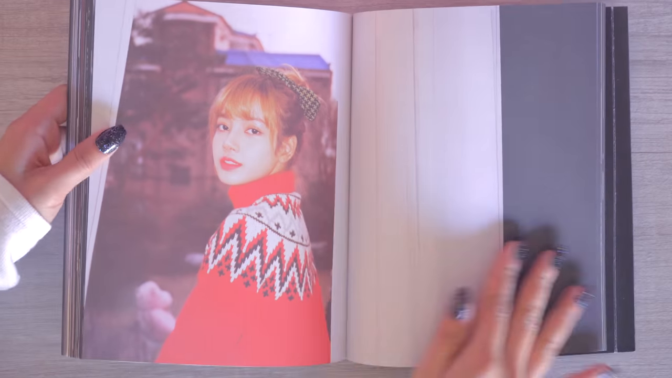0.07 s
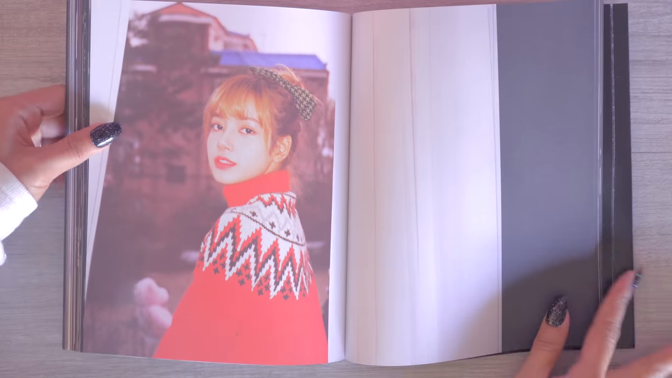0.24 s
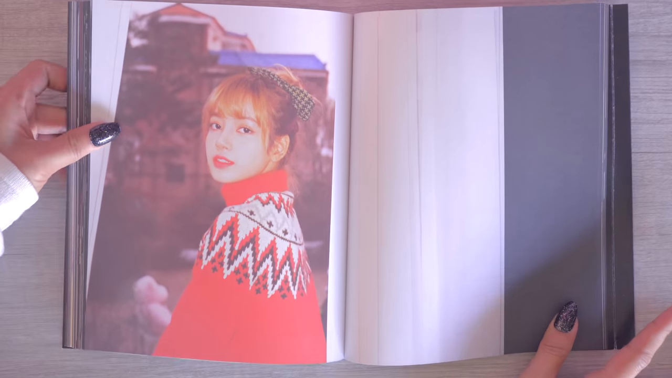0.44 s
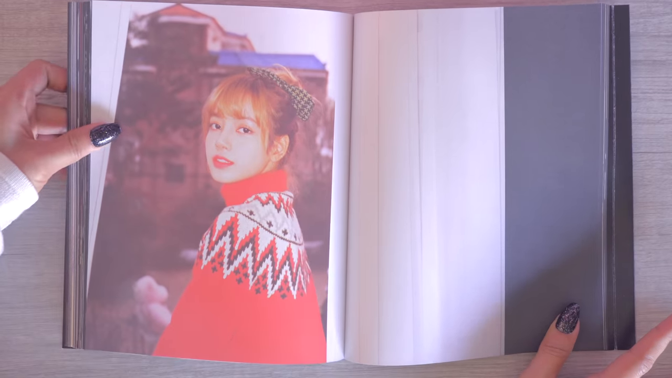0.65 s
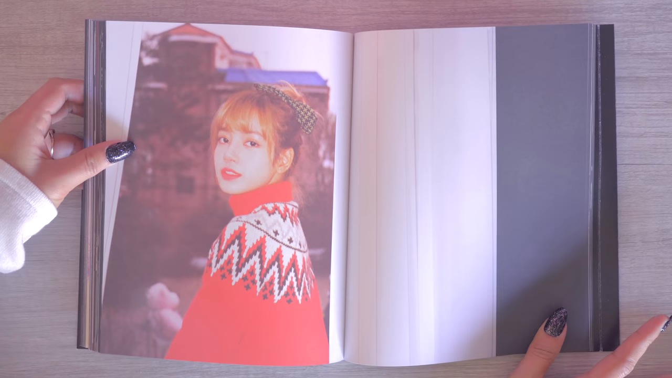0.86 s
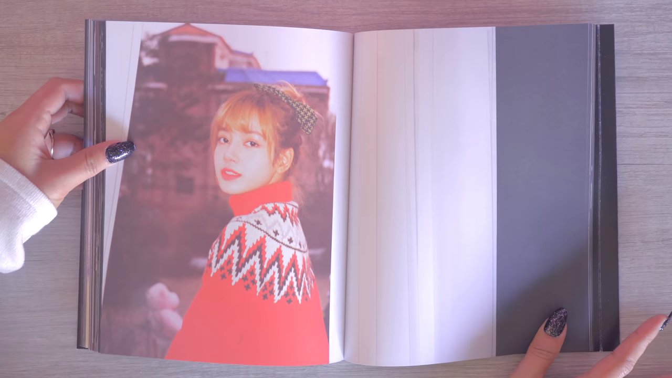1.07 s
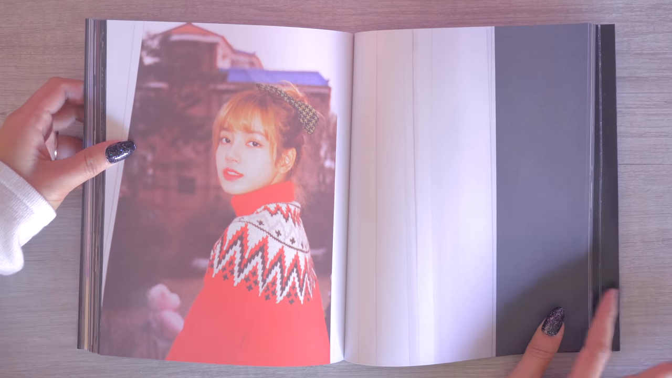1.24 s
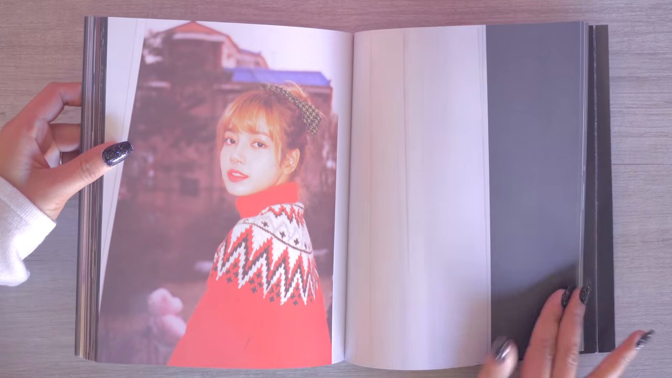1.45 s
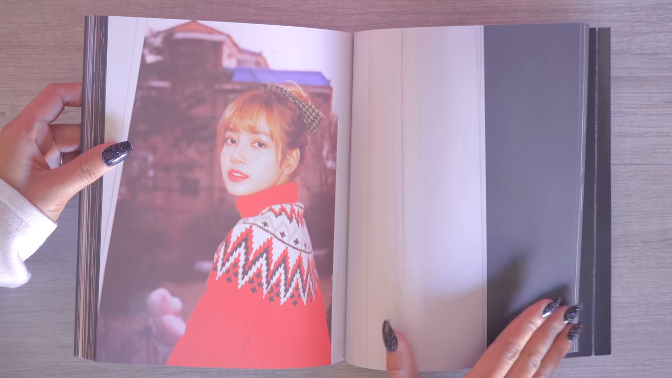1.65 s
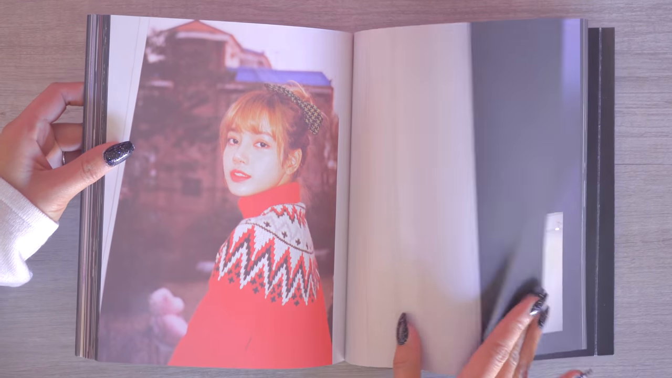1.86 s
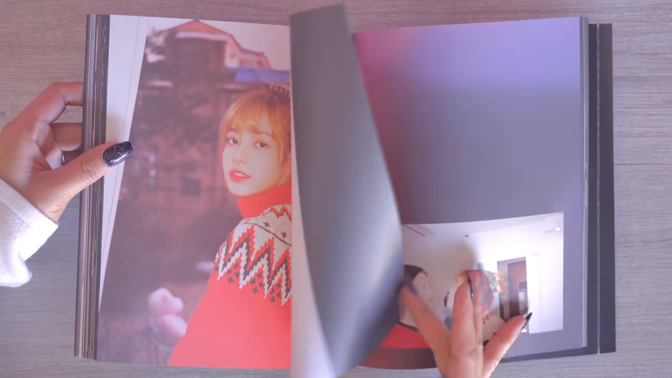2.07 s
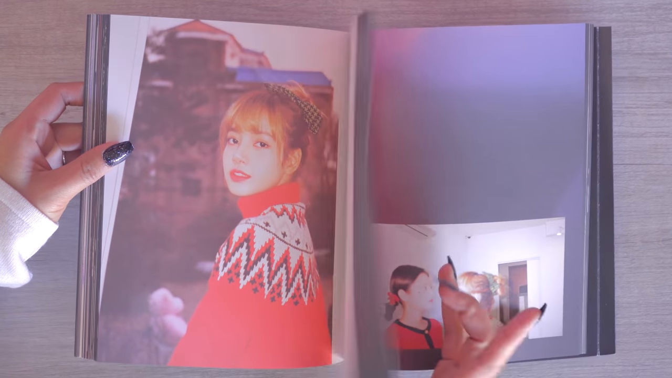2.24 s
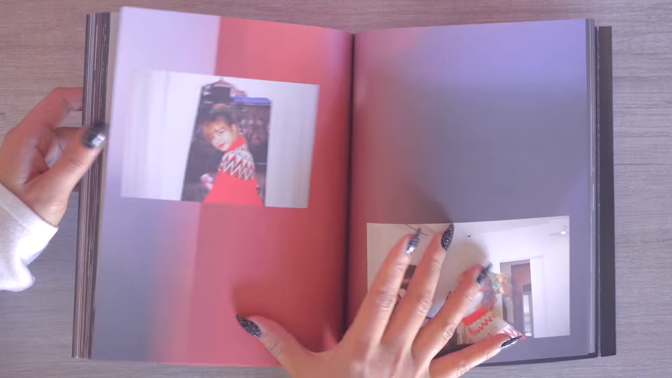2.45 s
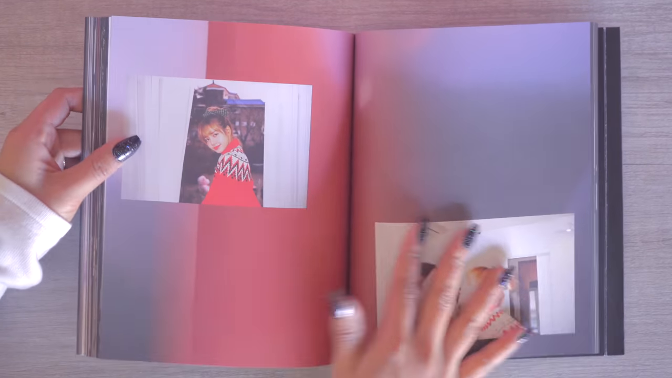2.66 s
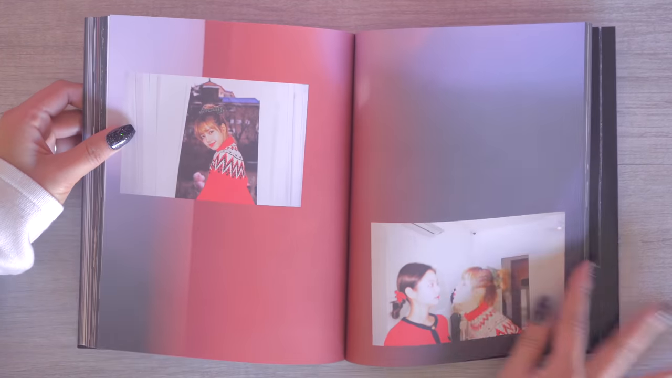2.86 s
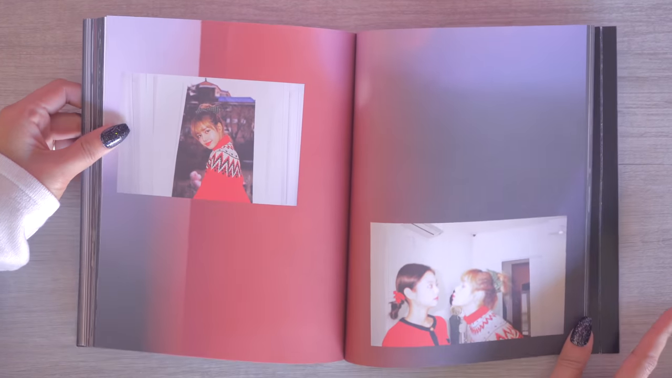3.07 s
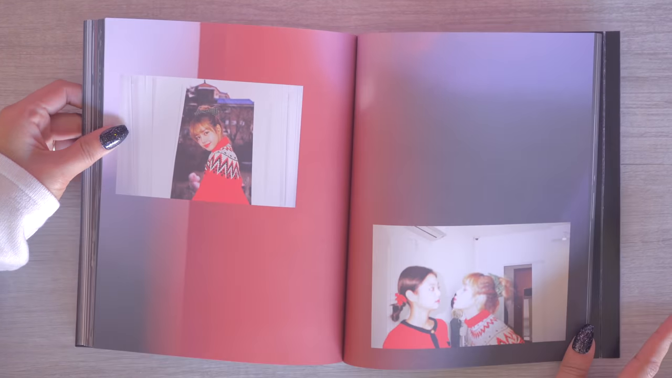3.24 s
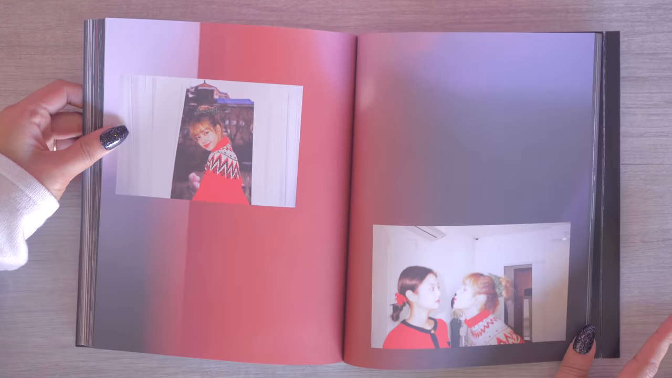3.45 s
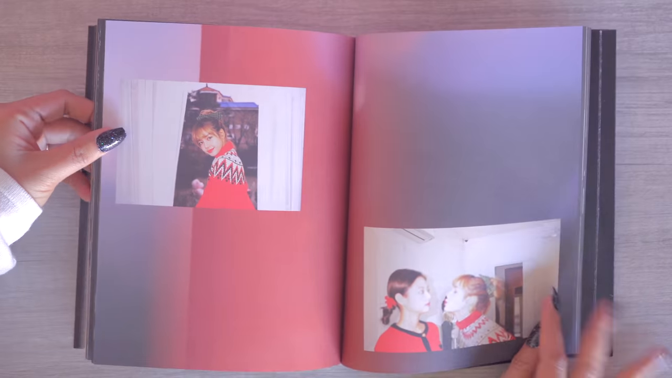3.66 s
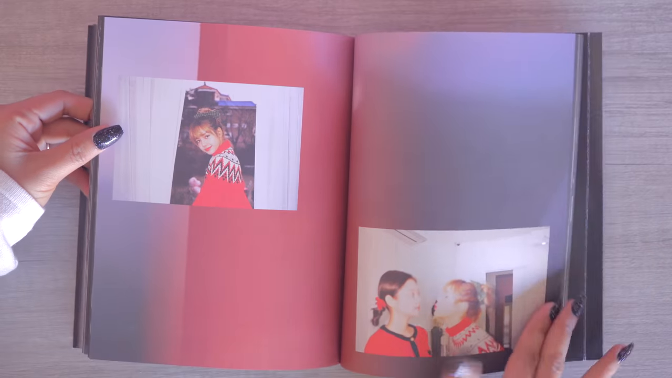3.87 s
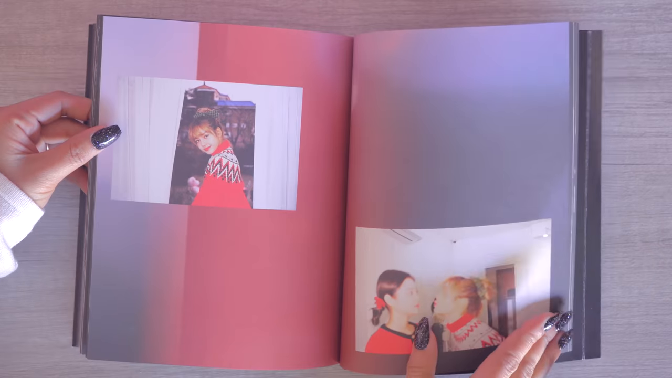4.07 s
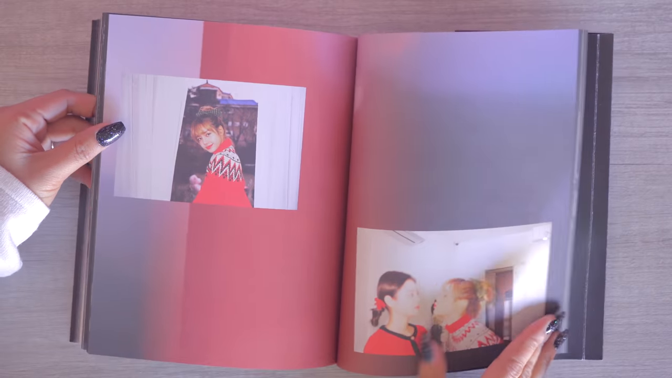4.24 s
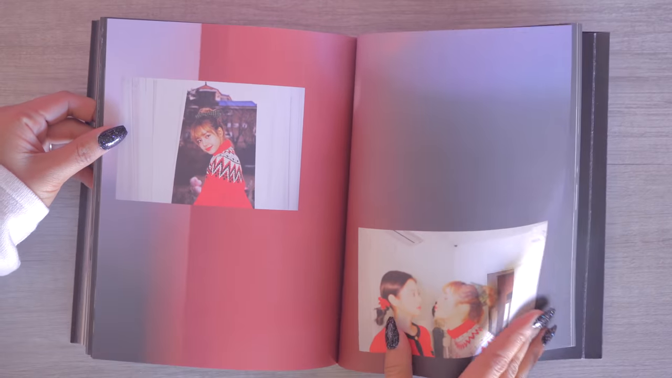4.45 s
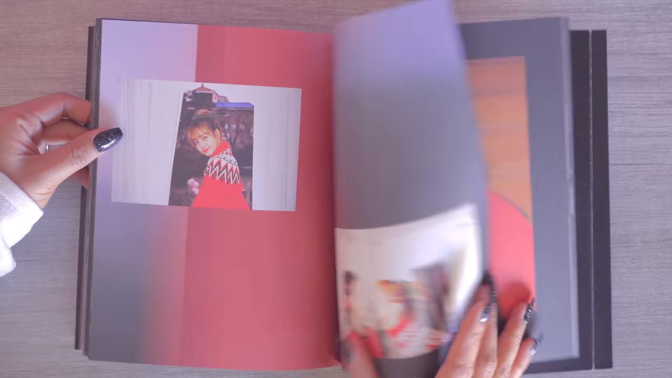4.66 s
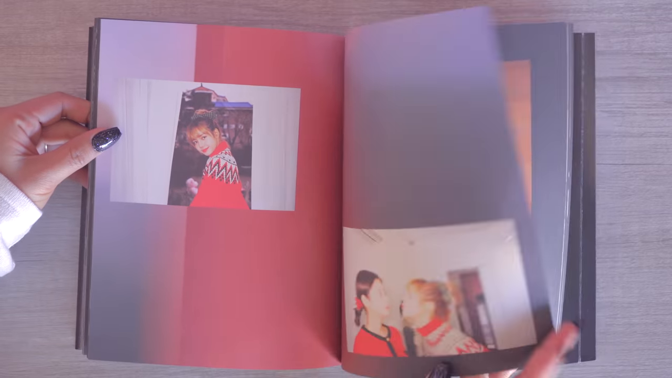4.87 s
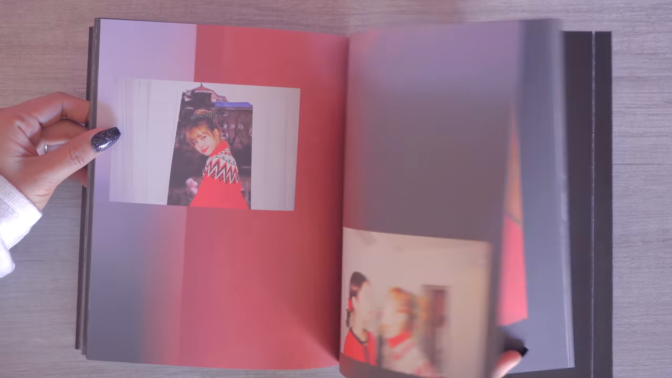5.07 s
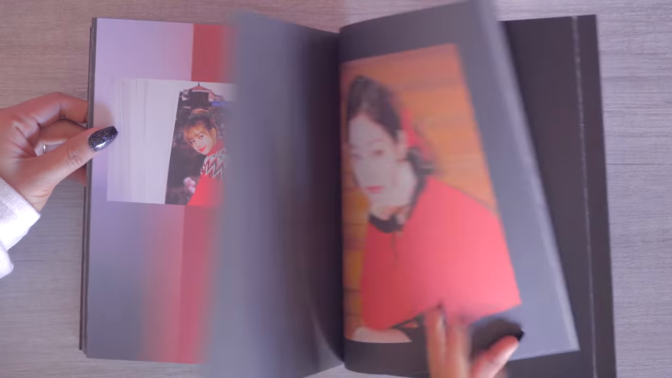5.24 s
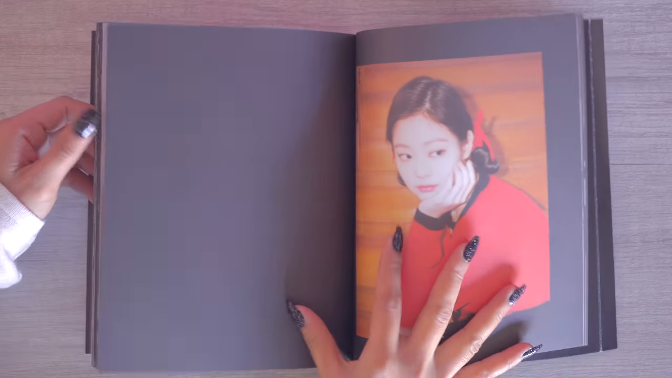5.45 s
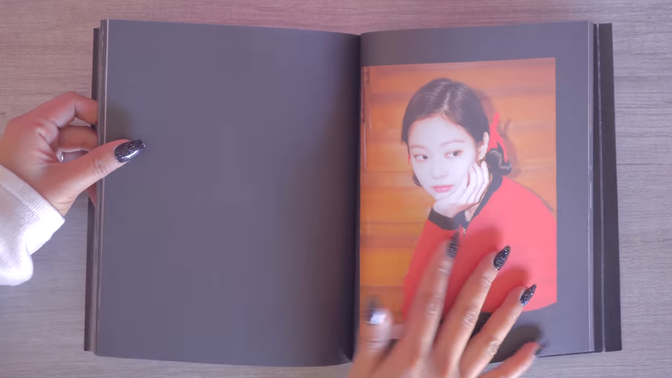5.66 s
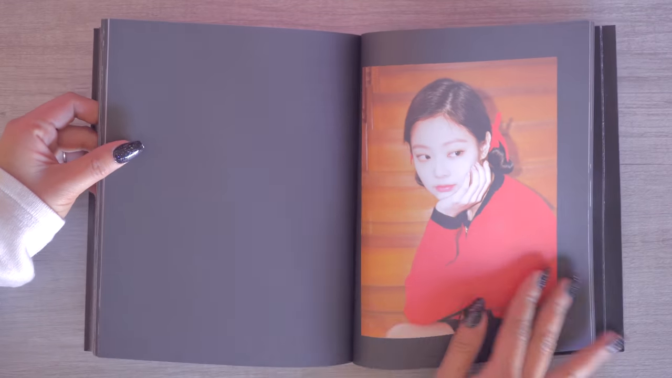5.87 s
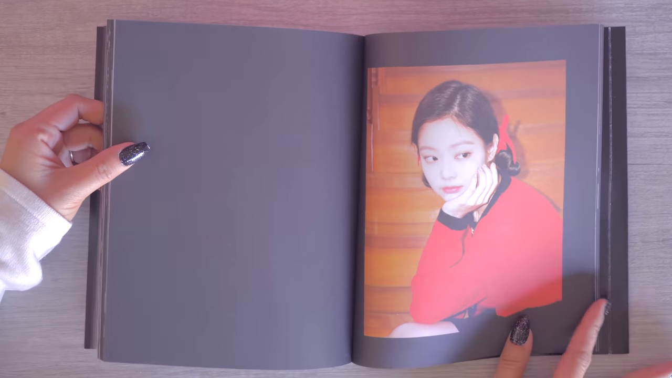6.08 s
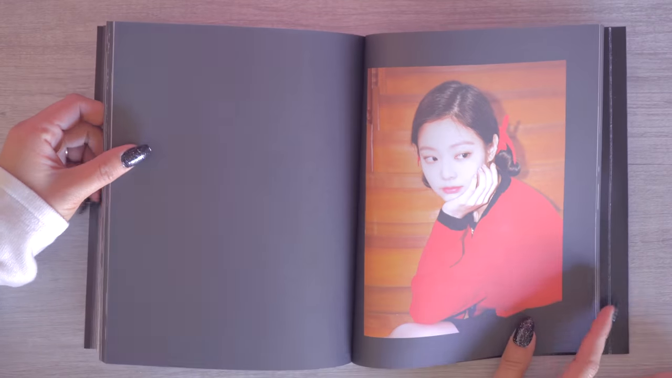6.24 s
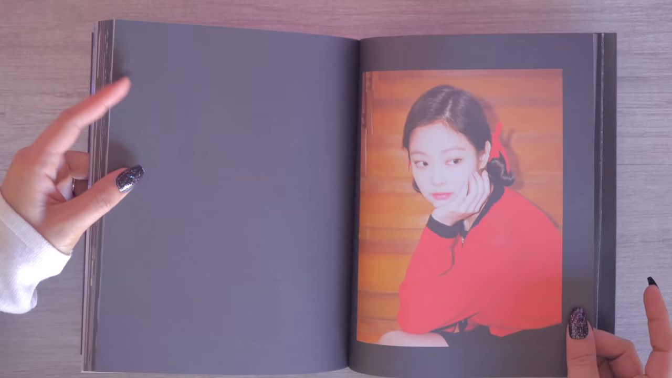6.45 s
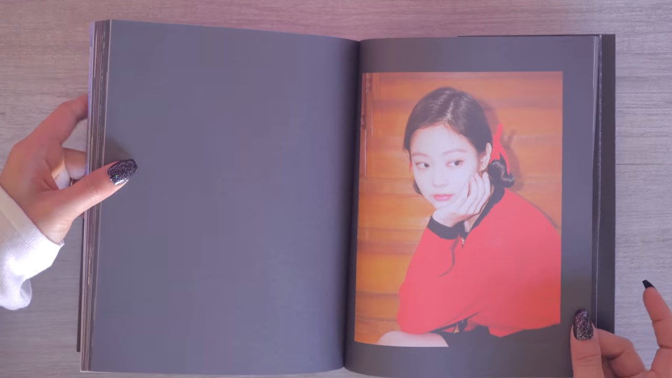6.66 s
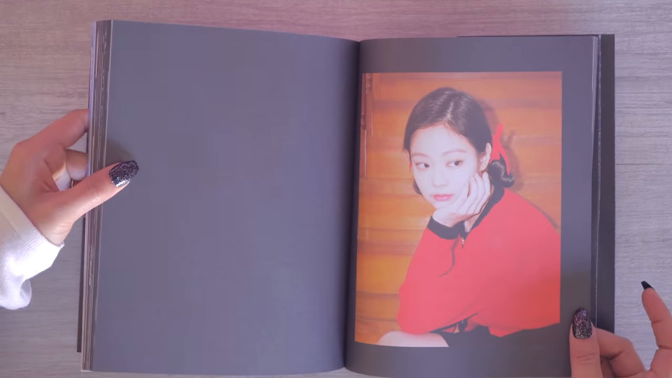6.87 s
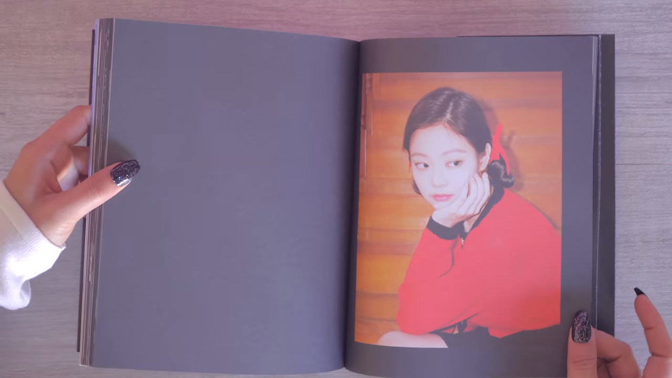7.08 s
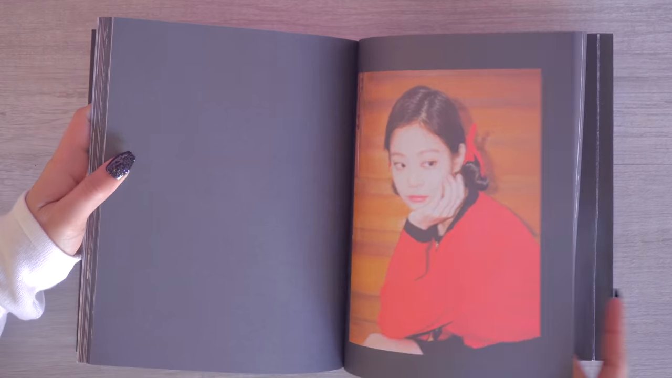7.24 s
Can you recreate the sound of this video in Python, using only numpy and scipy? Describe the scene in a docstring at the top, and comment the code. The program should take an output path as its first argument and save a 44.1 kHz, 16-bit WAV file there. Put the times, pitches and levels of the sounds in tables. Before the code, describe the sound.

In a quiet room, fingertips rub softly across coated paper, heard from close by. A thick book page is turned with a crisp, crackling flap, and a hand smooths it down. More sliding leads into a second, longer turn, followed by gentle rubbing and scattered nail ticks on the pages. The wooden desk thuds and rumbles softly under the hands throughout, over steady room air and a faint, brief low hum.

```python
"""Paper hisses, snaps and flaps as hands turn the thick glossy pages of a book on a wooden desk, close by.
Sliding fingers scrape the coating and flex the sheet; it buckles in short crackles.
Snaps and nail ticks ring the block of pages; soft blows and dragging hands make the desk thud and rumble.
Behind it is a quiet room: steady air, short reverberation, faint hums that come and go."""
import sys
import numpy as np
from scipy import signal
from scipy.fft import rfft, irfft, next_fast_len
from scipy.io import wavfile
from scipy.ndimage import uniform_filter1d, map_coordinates

SR = 44100
rng = np.random.default_rng(int(sys.argv[2]) if len(sys.argv) > 2 else 0)


def generate_wav(sig):
    """Save sig (samples, or channels by samples) to the path in sys.argv[1] as 16-bit PCM at SR."""
    pcm = np.round(np.clip(np.atleast_2d(sig).T, -1, 1) * 32767).astype(np.int16)
    wavfile.write(sys.argv[1], SR, pcm)


N = 322371

# Modes of the block of pages. Each row: frequency in Hz, level in dB, T60 in seconds.
BOOK_MODES = [(564, -4, 0.044), (745, -1.5, 0.044), (977, -2.5, 0.036), (1070, -13, 0.053),
              (1530, -6.5, 0.016), (1760, -19, 0.025), (2250, -8.5, 0.022)]
# Hands resting and shifting. Each row: time in seconds, rub on paper in dB, drag on desk in dB.
RESTING_HANDS = [(0, -44.5, -38.5), (.14, -50.5, -34.5), (.49, -61, -38), (.6, -85, -46), (1.22, -84, -46),
                 (1.33, -59, -44), (1.8, -59.5, -43), (2.16, -49, -33.5), (2.55, -58, -40),
                 (3.02, -60.5, -40), (3.2, -66, -41), (3.55, -74, -45.5), (3.75, -57.5, -42),
                 (4.4, -56, -40.5), (5.15, -51.5, -39.5), (5.39, -52, -36), (5.7, -57, -36.5),
                 (6.2, -66, -40), (6.5, -57.5, -38), (6.7, -58.5, -38), (7.03, -66, -40.5),
                 (7.15, -55, -38.5), (7.31, -54.5, -43)]


def amp(db):
    """Gain of a level in dB."""
    return 10 ** (np.asarray(db) / 20)


def unit_rms(x):
    """x at rms 1."""
    return x / np.sqrt(np.mean(x ** 2) + 1e-20)


def curves(rows):
    """One value per sample for each column after the time."""
    times_s, *columns = np.transpose(rows)
    return [np.interp(np.arange(N) / SR, times_s, column) for column in columns]


def wobble(rate_hz):
    """Smooth random curve, rate_hz knots a second."""
    knots = rng.standard_normal(int(N * rate_hz / SR) + 4)
    return map_coordinates(knots, [np.arange(N) * rate_hz / SR])


def filtered(x, response):
    """x through a response given as a function of Hz."""
    size = next_fast_len(x.shape[-1] + 8192)
    return irfft(rfft(x, size) * response(np.fft.rfftfreq(size, 1 / SR)), size)[..., :x.shape[-1]]


def resonance(hz, centre_hz, width_hz):
    """Causal resonance, gain 1 at its centre."""
    return 1j * hz * width_hz / (centre_hz ** 2 - hz ** 2 + 1j * hz * width_hz)


def ring_modes(modes, t, scatter_db):
    """Decaying sines of a struck body, each at a randomly scattered level."""
    return sum(amp(db + rng.normal(0, scatter_db) - 60 * t / t60_s) * np.sin(2 * np.pi * hz * t)
               for hz, db, t60_s in modes)


def grainy_noise(spectrum, grain_db, patchy_db):
    """Dense tiny slips of uneven size, coloured, with time-frequency patches of random gain; rms 1."""
    slips = rng.standard_normal(N) * amp(grain_db * wobble(900))
    bins = signal.stft(slips, nperseg=256)[2]
    patches = uniform_filter1d(uniform_filter1d(rng.standard_normal(bins.shape), 5, 0), 8, 1)
    depth_db = np.interp(np.arange(bins.shape[1]) * 128, np.arange(N), np.broadcast_to(patchy_db, N))
    patched = signal.istft(bins * amp(depth_db * unit_rms(patches)), nperseg=256)[1][:N]
    hz, db = np.transpose(spectrum)
    colour = lambda f: amp(np.interp(np.log(f + 1), np.log(hz + 1), db, left=-90, right=-90))
    return unit_rms(filtered(patched, colour))


def room_air():
    """Steady noise of the quiet room."""
    # Each row: frequency in Hz, relative density in dB.
    spectrum = [(250, -9), (420, -4.5), (650, -3), (1100, -10), (2000, -17), (3000, -17), (8000, -23.5),
                (16500, -25)]
    return amp(-58) * grainy_noise(spectrum, grain_db=1.5, patchy_db=2.0)


def hums():
    """Low hums and one faint thin tone fade in and out, wavering in pitch and level."""
    # Each row: start and end in seconds, start and end pitch in Hz, start and end level in dB.
    tones = [(5.14, 5.62, 154, 160, -40, -38), (5.84, 6.52, 114.5, 118, -45, -38),
             (5.9, 6.3, 295, 301, -59, -54), (.71, .9, 1320, 1326, -64, -65)]
    out, t = np.zeros(N), np.arange(N) / SR
    for start_s, end_s, start_hz, end_hz, start_db, end_db in tones:
        hz, db = curves([(start_s, start_hz, start_db), (end_s, end_hz, end_db)])
        fade = np.clip(np.minimum(t - start_s, end_s - t) / 0.03, 0, 1)
        gain = np.sqrt(2) * fade * amp(db + 3 * wobble(20))
        cycles = np.cumsum(hz * (1 + 0.01227 * wobble(11))) / SR
        out += gain * np.sin(2 * np.pi * cycles)
    return out


def walls(x):
    """Room reverberation of x; each frequency dies at its own rate."""
    # Each row: frequency in Hz, T60 in seconds.
    decay_times = [(200, 0.11), (1500, 0.36), (8000, 0.13)]
    hz, t, bins = signal.stft(rng.standard_normal(SR // 2), SR, nperseg=256)
    t60_s = np.interp(hz, *np.transpose(decay_times))
    tail = signal.istft(bins * amp(-60 * t / t60_s[:, None]), SR, nperseg=256)[1]
    delayed = np.pad(x, (300, 0))
    return signal.fftconvolve(delayed, tail / np.linalg.norm(tail))[:N]


def desk():
    """Soft blows ring the desk top and give it a deep push; dragging hands keep it rumbling."""
    # Each row: start in seconds, level in dB, push in dB over that level, push frequency in Hz.
    thuds = [(.13, -31, -5, 67), (0.212, -32, 15, 62), (0.294, -20.5, 1, 62), (0.392, -23, -14, 125),
             (0.422, -24, -10, 124), (.491, -40.5, 19, 107), (.577, -36, 6, 124), (1.482, -35.5, -28, 65),
             (1.942, -30.5, -5, 62), (2.102, -18, -9, 65), (2.122, -34, -7, 124), (2.246, -9, 4, 83.5),
             (2.294, -14.5, -13, 124), (2.454, -28.5, 15, 132), (2.483, -26, 9, 125),
             (2.618, -25.5, 8, 121), (2.647, -28, 12, 125), (2.917, -31, -11, 97), (2.969, -41, 23, 112),
             (3.042, -34.5, 11, 121), (3.155, -28.5, 4, 124), (3.646, -29.5, 10, 62), (3.766, -27, -4, 73),
             (3.98, -31, 18.5, 61), (4.064, -27, -6, 75), (4.156, -23, -24, 125), (4.385, -33.5, 26, 85.5),
             (4.401, -34.5, 21.5, 63), (4.422, -27.5, 10.5, 118), (4.669, -31, 11, 125),
             (4.892, -24.5, -9, 124), (5.109, -26.5, -2, 118), (5.254, -22, -16, 73), (5.485, -17, 3.5, 87),
             (5.791, -28, -4, 65), (5.939, -26, -19, 116), (6.293, -28.5, -10, 102), (6.508, -41, -8, 110),
             (6.608, -23, 8, 61.6), (6.694, -29, 8, 62)]
    # Each row: frequency in Hz, level in dB, T60 in seconds.
    desk_modes = [(219.9, 3, 0.11), (124, -2.5, 0.077), (201, -8, 0.093), (619, -14, 0.11),
                  (747, -22, 0.041)]
    # Each row: frequency in Hz, relative density in dB.
    rumble_spectrum = [(15, -10), (30, 4), (55, 1.5), (120, -0.5), (170, -5.5), (225, -2.5), (300, -14),
                       (420, -26)]
    rise_s, push_t60_s = 0.0056, 0.048
    out, t = np.zeros(N + SR), np.arange(SR // 4) / SR
    for start_s, db, push_db, push_hz in thuds:
        ring = ring_modes(desk_modes, t, scatter_db=2)
        push = amp(push_db - 60 * t / push_t60_s) * np.sin(2 * np.pi * push_hz * t)
        out[round(start_s * SR):][:len(t)] += amp(db) * (1 - np.exp(-t / rise_s)) * (ring + push)
    drag_db = curves(RESTING_HANDS)[1] + 0.91 * wobble(14)
    return out[:N] + amp(drag_db) * grainy_noise(rumble_spectrum, grain_db=-2.0, patchy_db=0.8)


def crackles():
    """The sheet buckles: quick swells of pitched noise with a crisp edge; the pages below ring along."""
    # Each row: start in seconds, nominal peak in dB, centre in Hz, rise in seconds, relative edge in dB.
    buckles = [(0.336, -20.5, 724, 0.0062, -21), (0.395, -20, 580, 0.0028, -12.5),
               (1.999, -7, 4030, 0.0099, -17), (2.098, -6, 840, 0.0035, -6.5),
               (2.174, -23, 1510, 0.0029, -10), (2.194, -7.5, 3600, 0.0068, -1.5),
               (2.204, 2, 1580, 0.0048, -6), (2.234, -15, 1440, 0.01, -18), (2.249, -13, 980, 0.0089, -25),
               (2.287, -1, 705, 0.0042, -20), (2.299, -15, 802, 0.0016, -32),
               (2.33, -23, 1180, 0.0086, -24), (2.446, -15, 1810, 0.0034, -10),
               (2.904, -11.5, 730, 0.0052, -15), (2.924, -23, 1010, 0.0015, -18),
               (3.751, -18, 554, 0.0047, -27), (4.743, -1.5, 1350, 0.0055, -10),
               (4.83, -25, 1010, 0.0072, -2), (4.889, -9, 1700, 0.0033, -26),
               (5.065, -15.5, 2400, 0.012, -13), (5.121, -5.5, 990, 0.0046, -18),
               (5.292, -20.5, 1060, 0.0046, -5), (5.455, -14, 2100, 0.0034, -10),
               (5.599, -38, 3500, 0.003, -19), (7.19, -28, 1380, 0.0064, 0), (7.235, -27, 1380, 0.0065, -4)]
    crest_db = 15
    out, t = np.zeros(N + SR), np.arange(SR // 10) / SR
    pages = lambda f: 1 + 1.1 * sum(resonance(f, mode_hz, 91) for mode_hz, _, _ in BOOK_MODES)
    for start_s, peak_db, hz, rise_s, edge_db in buckles:
        body_noise, edge_noise = rng.standard_normal((2, len(t)))
        body = unit_rms(filtered(body_noise, lambda f: resonance(f, hz, 0.81 * hz) ** 2 * pages(f)))
        edge = unit_rms(filtered(edge_noise, lambda f: resonance(f, 3300, 2300) ** 2))
        swell = amp(peak_db - crest_db) * t / rise_s * np.exp(1 - t / rise_s)
        out[round(start_s * SR):][:len(t)] += swell * (body + amp(edge_db + 1.5) * edge)
    return out[:N]


def snaps():
    """Paper snaps, nail ticks: an impulse and brief rattle ring a broad resonance, treble and book."""
    # Each row: start in seconds, body peak in dB, centre in Hz, treble gain in dB, book ring gain in dB.
    impacts = [(.0211, -28, 3840, -24, -27.5), (0.0966, -33, 2360, -26, -25.5),
               (0.2005, -22, 3530, -14, -26.5), (0.2525, -26, 3430, -28, -30),
               (0.2928, -16.5, 1690, -40, -19), (0.4925, -34, 3050, -28, -39),
               (0.5784, -55, 1960, -38, -37), (1.3493, -29, 3680, -19, -58), (1.37, -31, 3170, -22, -40),
               (1.9509, -21, 3650, -19, -27.5), (2.0986, -11.5, 2400, -4.5, -31.5),
               (2.2066, -1, 2370, 5, -19), (2.2209, -16, 1920, -6, -15), (2.2854, -16, 3010, -4, -20),
               (2.4705, -28, 3680, -14, -28), (2.5842, -26, 3220, -21, -45), (2.9055, -30, 1820, -15, -33),
               (2.929, -19.5, 4150, -22, -48), (3.042, -29.5, 3570, -43, -34.5),
               (3.6514, -28, 2960, -21, -36), (4.1476, -40, 3210, -35, -30), (4.8886, -17, 2370, -35, -37),
               (4.9154, -17, 1950, -26, -37.5), (5.2508, -22, 2110, -35, -31),
               (5.4688, -10, 2240, -7, -22.5), (5.8227, -14.5, 3650, -8, -40),
               (6.0916, -34, 2420, -31, -39), (6.2886, -21, 2070, -18.5, -32.5),
               (6.3208, -32, 3690, -21, -50), (6.4878, -35, 3760, -36, -32.5),
               (6.6082, -12.5, 2250, -11, -23), (6.934, -41.5, 2770, -45, -41),
               (7.1241, -24.5, 2200, -30, -38), (7.1549, -12, 2430, -24, -31),
               (7.2801, -34, 2150, -37, -37)]
    rattle_db, rattle_t60_s, treble_t60_s, ring_rise_s = -22, 0.034, 0.08, 0.0004
    out, t = np.zeros(N + SR), np.arange(SR // 10) / SR
    for start_s, peak_db, hz, treble_db, ring_db in impacts:
        blow = amp(rattle_db - 60 * t / rattle_t60_s) * rng.standard_normal(len(t))
        blow[0] = 1  # the impulse
        band = lambda f: resonance(f, hz, 0.64 * hz) * resonance(f, hz, 2.6 * hz)
        body = filtered(blow, lambda f: band(f) / (1 + 1j * f / (2.1 * hz)) ** 2)
        treble = filtered(blow * amp(-60 * t / treble_t60_s), lambda f: resonance(f, 7700, 7800) ** 2)
        ring = ring_modes(BOOK_MODES, t, scatter_db=3.9) * (1 - np.exp(-t / ring_rise_s))
        snap = amp(peak_db) * body / np.abs(body).max() + amp(treble_db) * treble + amp(ring_db) * ring
        out[round(start_s * SR):][:len(t)] += snap
    return out[:N]


def touch_levels():
    """Slide level, and flex and hiss over it, in dB: resting hands plus each stroke, summed in power."""
    # Each row: start, lift-off and rise in seconds, full slide level in dB, sag until lift-off in dB,
    # sheet flex and skin hiss in dB over the slide.
    strokes = [(0, 0.274, 0.0037, -44, 1.5, -0.5, -1), (0.317, 0.371, .02, -52.5, 0, 7, -7),
               (0.387, 0.435, 0.0033, -52, 4, 11, -8), (1.37, 1.413, .008, -54, 8, -2, -8),
               (1.423, 1.463, 0.015, -41.5, 1, -3, -7), (1.582, 1.72, 0.049, -43.5, 3.5, -10, -6.5),
               (1.783, 1.82, 0.019, -37.5, -1, -9, -8.5), (1.815, 2.083, 0.014, -22, 9, -8.5, -5),
               (2.08, 2.162, 0.011, -32, 25, -4, -15), (2.181, 2.214, .022, -28.5, 16, 2.5, -9),
               (2.221, 2.266, 0.017, -18.5, 11.5, 8, -36), (2.272, 2.384, 0.015, -31, 30, 13.5, -23),
               (2.308, 2.425, .02, -43.5, -3.5, 1, -11.5), (2.447, 2.491, 0.039, -33.5, 4.5, -3.5, -14),
               (2.581, 2.665, .005, -44, 9, -7, -9), (2.653, 2.966, 0.017, -41.5, 1.5, -2.5, -2.5),
               (2.902, 2.935, 0.021, -36.5, 16, 6, -3.5), (3.057, 3.196, 0.032, -54, -4, 9, -7.5),
               (3.603, 3.718, 0.011, -51, 2, 2.5, -10.5), (3.712, 3.834, 0.052, -40, 14.5, 0, -8),
               (3.966, 4.035, .017, -43, 6.5, -10, -5), (4.032, 4.094, 0.05, -44, 1, 0, -7.5),
               (4.143, 4.179, .01, -42, 4, -3, -4), (4.177, 4.223, .02, -45, 0, -6, -8),
               (4.257, 4.305, 0.036, -37, 10, -10, -6), (4.385, 4.397, .005, -50.5, 6, 7, -6),
               (4.439, 4.539, 0.051, -21, 5.5, -12, -9.5), (4.524, 4.762, 0.049, -24, 4.5, -10.5, -8.5),
               (4.768, 4.846, .005, -44, 16, 2, -4.5), (4.883, 4.983, 0.0072, -36, -2, 1, -12.5),
               (5.014, 5.15, 0.073, -32.5, 0.5, 3.5, -11.5), (5.15, 5.219, 0.018, -35, 19, -5, -9),
               (5.245, 5.343, 0.0079, -40.5, 14, 5.5, -9.5), (5.34, 5.433, 0.047, -32.5, 10, -3, -8),
               (5.456, 5.491, 0.018, -37, 10, 0, -8), (5.529, 5.56, .012, -43.5, 13, -11, -7.5),
               (5.597, 5.618, 0.0077, -37, 1.5, -26, -9), (5.623, 5.788, 0.055, -50.5, -8.5, 5, -2.5),
               (5.748, 6.029, .06, -45, -0.5, -2, -2.5), (6.01, 6.137, .02, -49.5, 17, 3.5, -7),
               (6.31, 6.358, .01, -48.5, 0, 2, -7), (6.39, 6.415, .02, -54, 0, 2.5, -6),
               (6.438, 6.46, .014, -51, -1, -5, -7), (6.484, 6.547, 0.03, -42, 12, 2.5, -4),
               (6.595, 6.672, .004, -51.5, 11, 10.5, -14), (7.154, 7.178, .004, -38, 10, -12, -8)]
    release_s = 0.014  # per 20 dB of fall
    flex_sag_share, hiss_sag_share = 0.53, 0.68
    t = np.arange(0, N / SR, 0.001)
    rub_db = np.interp(t, *np.transpose(RESTING_HANDS)[:2])
    faintness_db = -60.5 - rub_db  # the fainter the rub, the more flex and hiss stand out
    over_rub_db = np.array([np.zeros_like(t), 8 + 0.64 * faintness_db, -8 + 0.26 * faintness_db])
    power = amp(rub_db + over_rub_db) ** 2  # rows: slide, flex, hiss
    for start_s, end_s, rise_s, db, sag_db, flex_db, hiss_db in strokes:
        swell = np.clip((t - start_s) / rise_s, 0, 1) ** 1.14
        release = amp(-20 * np.clip(t - end_s, 0, None) / release_s)
        hold_s = max(end_s - start_s - rise_s, 0.002)
        drop_db = sag_db * np.clip((t - start_s - rise_s) / hold_s, 0, 1)
        offsets_db = [-drop_db, flex_db - flex_sag_share * drop_db, hiss_db - hiss_sag_share * drop_db]
        slide, flex, hiss = swell * release * amp(db + np.array(offsets_db))
        progress = np.clip((t - start_s) / (end_s - start_s + release_s), 0.02, 0.98)
        hand_speed = np.sin(np.pi * progress)
        power += np.array([slide, flex, hand_speed ** 0.24 * hiss]) ** 2
    slide_db, flex_db, hiss_db = (np.interp(np.arange(N) / SR, t, row) for row in 10 * np.log10(power))
    return slide_db, flex_db - slide_db, hiss_db - slide_db


def sliding_fingers():
    """Fingers scrape the coating, bend the sheet and hiss; the grip flutters."""
    # Spectra. Each row: frequency in Hz, relative density in dB.
    coating_spectrum = [(900, -16), (1600, -1), (2300, 3.5), (3100, 4.5), (3900, 5.5), (4700, -5.5),
                        (6000, -14.5)]
    flat_sheet_spectrum = [(330, -13), (450, -8), (640, 3.5), (950, -3), (1250, -6), (1600, -2),
                           (2000, -13), (2800, -40.5)]
    raised_sheet_spectrum = [(520, -13), (750, -12), (970, 0), (1250, -6.5), (1550, -1), (1900, -11),
                             (2800, -25)]
    skin_spectrum = [(3500, -1.5), (5200, -0.5), (6500, 1.5), (8500, 2), (11000, -6), (16500, -18)]
    palm_spectrum = [(7000, -9), (10000, 7), (13000, 6), (16500, 4)]
    slide_db, flex_db, hiss_db = touch_levels()
    # A loud slide is a raised sheet: coarser grain, higher flex, duller hiss.
    lift = np.clip((slide_db + 43) / 9, 0, 1)
    grip_db = slide_db + (0.3 + 0.7 * lift) * wobble(60)
    slide = grainy_noise(coating_spectrum, grain_db=0.4 + 1.3 * lift, patchy_db=0.6 + 1.9 * lift)
    flat = grainy_noise(flat_sheet_spectrum, grain_db=0.8, patchy_db=3.0)
    raised = grainy_noise(raised_sheet_spectrum, grain_db=0.0, patchy_db=1.5)
    flex = amp(flex_db) * (np.sqrt(1 - lift) * flat + np.sqrt(lift) * raised)
    palm_db = 4.0 + 2.55 * hiss_db - 10 * lift  # more skin on the page, finer hiss
    palm = amp(palm_db) * grainy_noise(palm_spectrum, grain_db=0.6, patchy_db=0.6)
    skin = grainy_noise(skin_spectrum, grain_db=0.9 + 0.28 * lift, patchy_db=2.5 + 1.1 * lift)
    hiss = amp(hiss_db) * (skin + palm)
    return amp(grip_db) * (slide + flex + hiss)


def scene():
    """Paper with its reverberation, over the desk and the room; mono."""
    paper = sliding_fingers() + snaps() + crackles()
    background = hums() + room_air()
    return (background + paper + amp(-18.5) * walls(paper) + desk())[None]


def record(dry):
    """The input stage rounds off the highest peaks and limits the band."""
    ceiling, top_hz = 0.8, 15850
    rounded = dry / (1 + np.abs(dry / ceiling) ** 4) ** 0.25
    return filtered(rounded, lambda hz: hz < top_hz)


dry = scene()
out = record(dry)
generate_wav(out)
```